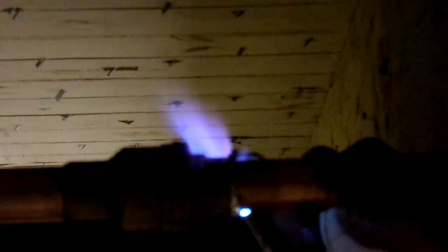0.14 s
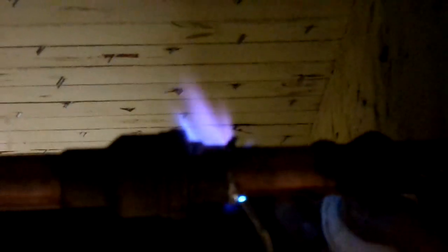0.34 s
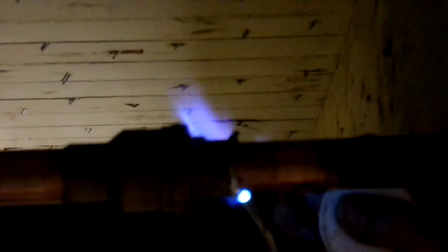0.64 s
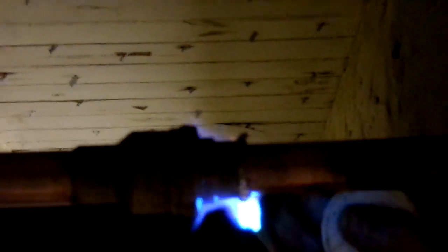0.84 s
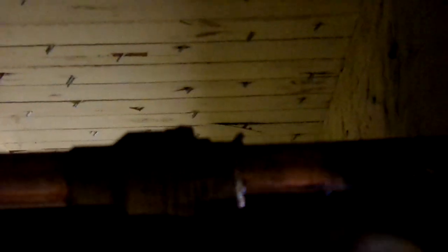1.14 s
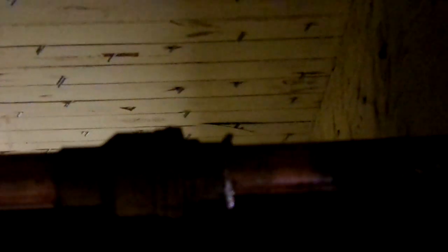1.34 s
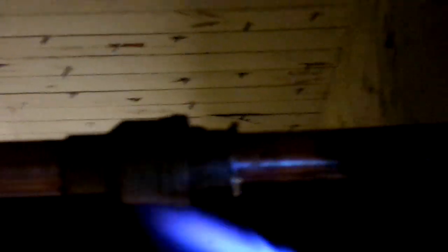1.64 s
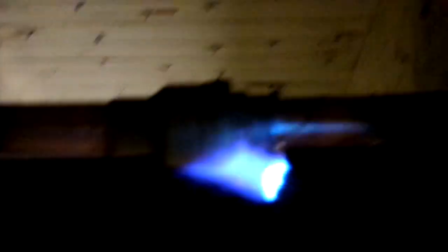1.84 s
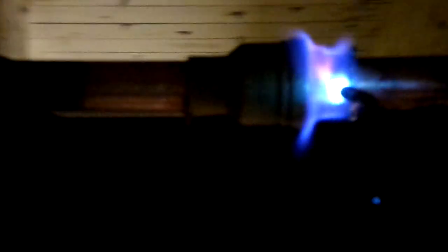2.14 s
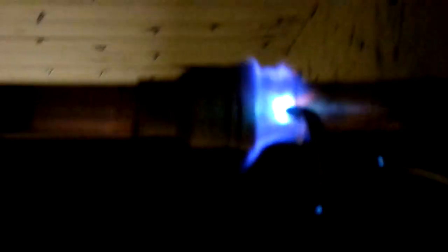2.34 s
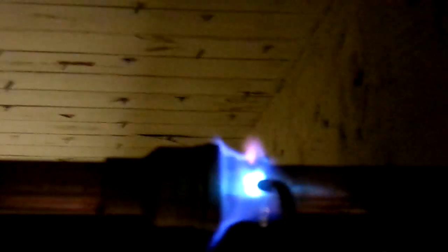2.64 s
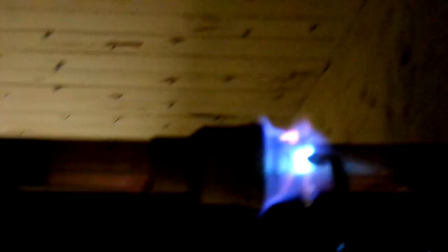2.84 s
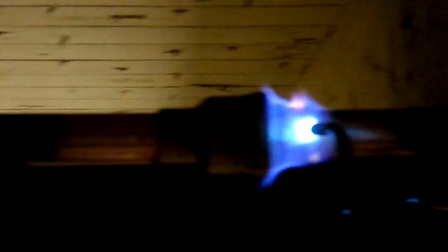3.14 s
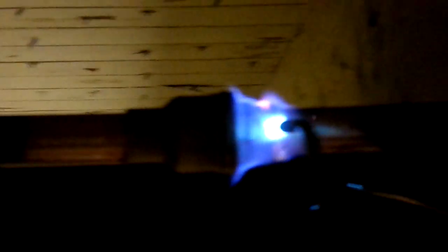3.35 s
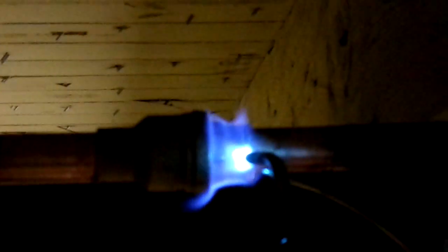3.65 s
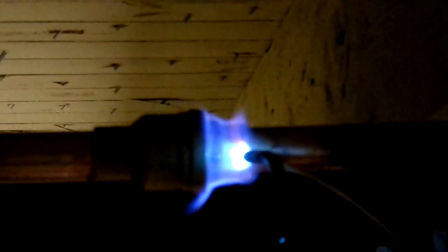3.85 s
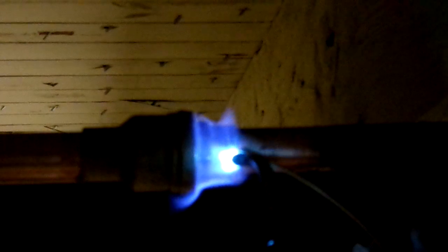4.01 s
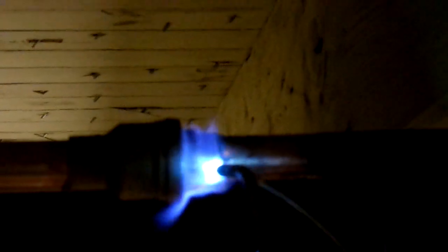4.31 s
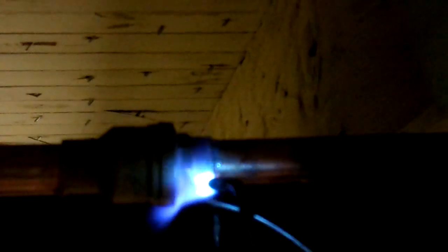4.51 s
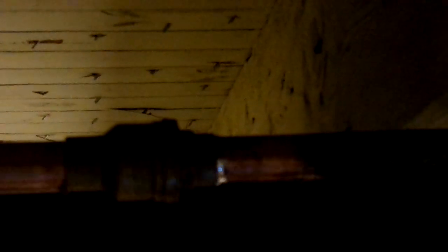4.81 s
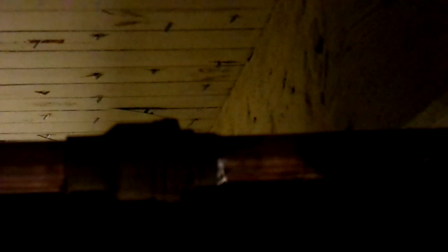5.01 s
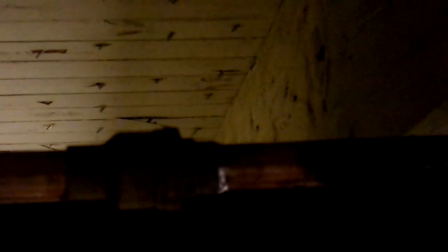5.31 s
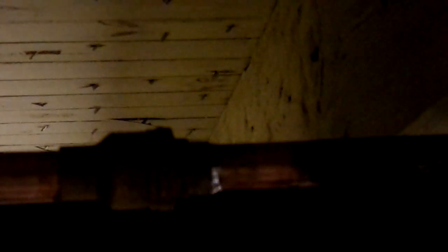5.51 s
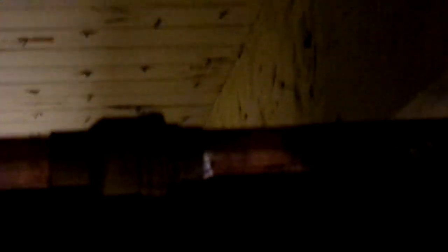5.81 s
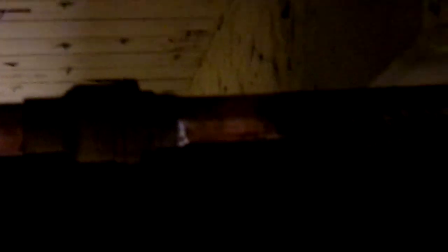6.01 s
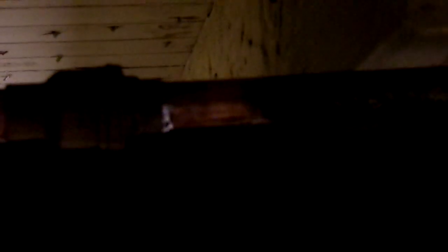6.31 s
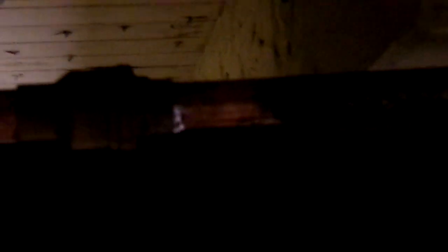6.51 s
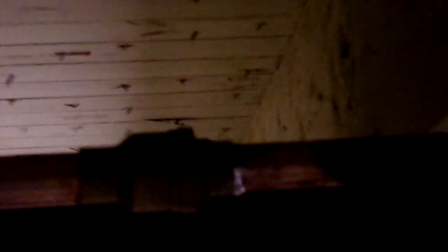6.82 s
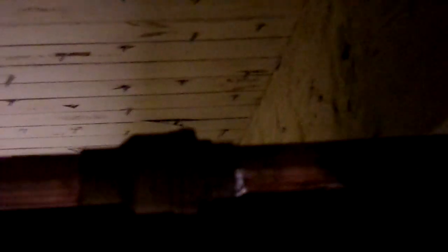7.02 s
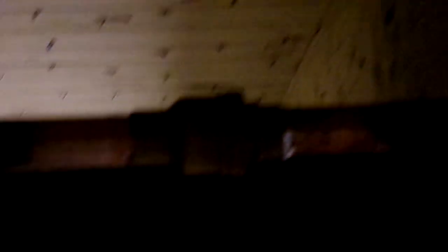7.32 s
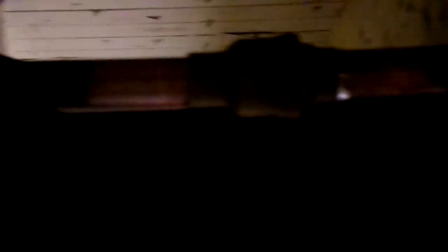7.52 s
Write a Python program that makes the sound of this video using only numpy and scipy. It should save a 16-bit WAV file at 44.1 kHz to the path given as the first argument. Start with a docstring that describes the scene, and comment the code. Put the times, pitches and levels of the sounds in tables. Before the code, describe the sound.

A handheld gas torch burns without a break on a copper pipe joint, very close to a mono microphone in a narrow wooden space. Bright pressurised hiss and a breathy whistle near 3.3 kHz dominate, over a softer combustion roar and faint rumble. About one second in, the whistle drops and falters, then rises again; later moves slide the hollow, phasing colour of the hiss.

```python
"""A handheld gas torch plays on a copper pipe joint in a narrow wooden space, close to a mono microphone.
Its burner tube sings as a noise-driven resonance; jet and flame are coloured noises whose levels follow
the flow: a hiss, a shrill band and a thin top for the gas, a roar and a rumble for the combustion.
Nearby boards and the pipe return echoes, made as a comb filter that slides when the hand moves."""
import sys
import numpy as np
from scipy import signal
from scipy.fft import rfft, irfft, next_fast_len
from scipy.io import wavfile
from scipy.ndimage import map_coordinates

SR = 44100
rng = np.random.default_rng(int(sys.argv[2]) if len(sys.argv) > 2 else 0)


def materialize(psi):
    """Save the field psi as 16-bit PCM at rate SR to the path in sys.argv[1].

    A 1-D psi becomes a single channel; in a 2-D psi each row is a channel.
    """
    bounded = np.clip(np.atleast_2d(psi).T, -1, 1)
    quanta = np.round(bounded * 32767).astype(np.int16)
    wavfile.write(sys.argv[1], SR, quanta)


N = 337796


def amp(db):
    """Gain of a level in dB."""
    return 10 ** (np.asarray(db) / 20)


def unit(x):
    """x scaled to rms 1."""
    return x / np.sqrt(np.mean(x ** 2) + 1e-20)


def curves(rows, t_s=None):
    """Each column after the time, interpolated at t_s (every sample by default)."""
    row_s, *columns = np.transpose(rows)
    if t_s is None:
        t_s = np.arange(N) / SR
    return [np.interp(t_s, row_s, column) for column in columns]


def wobble(knots_per_s):
    """Smooth random curve through normally distributed knots."""
    knots = rng.standard_normal(int(N * knots_per_s / SR) + 4)
    return map_coordinates(knots, [np.arange(N) * knots_per_s / SR])


def filtered(x, response):
    """x times a fixed response of frequency."""
    size = next_fast_len(N + 8192)
    spectrum = rfft(x, size) * response(np.fft.rfftfreq(size, 1 / SR))
    return irfft(spectrum, size)[..., :N]


def swept(x, response, size):
    """x times a response of frequency and time, by short-time spectra."""
    overlap = size * 3 // 4
    hz, t_s, frames = signal.stft(x, SR, nperseg=size, noverlap=overlap)
    frames = frames * response(hz[:, None], t_s)
    return signal.istft(frames, SR, nperseg=size, noverlap=overlap)[1][:N]


def noise(spectrum):
    """Noise of rms 1, coloured by (Hz, relative dB) points on a log frequency axis."""
    point_hz, point_db = np.transpose(spectrum)
    colour = lambda hz: amp(np.interp(np.log(hz + 1), np.log(point_hz), point_db))
    return unit(filtered(rng.standard_normal(N), colour))


def tube():
    """Turbulence excites the burner tube's air column; pitch sags when the flame is disturbed."""
    # Each row: time in seconds, mean note level in dB before the echoes, pitch in Hz.
    note_rows = [(0, -27.5, 3270), (.7, -28.2, 3194), (.8, -29.5, 2900), (.88, -39.5, 2600),
                 (.97, -35.5, 2440), (1.03, -33, 2700), (1.09, -30, 2300), (1.14, -29.5, 2850),
                 (1.25, -23.5, 3300), (1.4, -28.5, 3280), (1.52, -22.5, 3380), (1.57, -29.5, 3400),
                 (1.64, -28, 3410), (1.72, -37, 3290), (2.0, -30, 3410), (2.15, -26, 3330),
                 (4.55, -27.5, 3330), (4.76, -30.5, 3100), (4.87, -35.5, 3300), (5.04, -33, 3330),
                 (5.13, -35, 3330), (5.33, -29, 3380), (5.47, -23, 3440), (5.78, -28.5, 3440),
                 (6.15, -25.5, 3440), (6.68, -25.5, 3340), (6.85, -27, 3370), (7.0, -31.5, 3396),
                 (7.11, -27.5, 3365), (7.2, -32, 3320), (7.32, -24.5, 3400), (7.66, -28, 3430)]
    # Half width of the undisturbed note in Hz, one per place of the torch:
    # broad while the flame splashes on the pipe, thin in free air.
    place_half_hz = [90, 115, 115, 140, 140, 62, 62]
    rest_hz, widening_hz_per_hz = 3160, 0.22  # sag below rest_hz widens the note
    swing_hz = 500  # widening by the draught of a move, per unit of path change
    level_db, _ = curves(note_rows)

    def resonance(hz, t_s):
        pitch_hz = curves(note_rows, t_s)[1]
        place, path_divisor = hand(t_s)
        half_hz = np.interp(place, np.arange(len(place_half_hz)), place_half_hz)
        half_hz += swing_hz * abs(1 - path_divisor)
        half_hz += widening_hz_per_hz * np.maximum(rest_hz - pitch_hz, 0)
        return half_hz ** -.5 / (1 + ((hz - pitch_hz) / half_hz) ** 2)

    note = unit(swept(rng.standard_normal(N), resonance, size=1024))
    # the column partly sustains itself, which evens out its beating
    envelope = np.abs(signal.hilbert(note, next_fast_len(N))[:N])
    note = unit(note / (envelope + .3) ** .22)
    return amp(level_db + 0.37 * wobble(9.9)) * note


def jet():
    """Turbulent gas: broad hiss and shrill band share a flutter of the flow, under a thin top hiss."""
    # Each row: time in seconds, mean hiss level in dB, mean shrill level in dB, both before the echoes.
    # The treble beams along the nozzle.
    flow_rows = [(0, -34.5, -30), (.75, -33, -29.5), (.92, -36.5, -33), (1.02, -33, -26.5),
                 (1.1, -32, -28.5), (1.25, -30, -26), (1.46, -32, -23.5), (1.525, -32.5, -21.5),
                 (1.56, -32.5, -28), (1.8, -33.5, -28.5), (2.03, -31.5, -31.5), (2.25, -28.5, -27.5),
                 (3.2, -28, -27), (3.65, -31.5, -29.5), (4.45, -30.5, -30), (4.8, -33.5, -29),
                 (5.02, -37.5, -29.5), (5.22, -32, -29.5), (5.55, -34.5, -27), (6.35, -33.5, -26.5),
                 (6.95, -32.5, -29), (7.12, -34, -26), (7.32, -33.5, -29), (7.66, -36, -28.5)]
    # Each row: time in seconds, mean top hiss level in dB before the echoes.
    top_rows = [(0, -52), (.6, -60), (1.45, -38), (1.75, -46), (2.6, -58), (3.6, -45), (5.1, -41.5),
                (6.5, -46), (7.0, -38), (7.66, -42)]
    # Noise colours. Each row: frequency in Hz, relative density in dB.
    hiss_colour = [(1500, -69), (2600, -8), (4300, 1), (5300, 4), (6300, 1.5), (7500, -19), (10000, -11),
                   (13000, -62)]
    shrill_colour = [(5000, -34.5), (6400, -3.5), (7300, -0.5), (8200, 4.5), (9000, -4), (9900, -13.5),
                     (11000, -22.5), (12500, -28)]
    top_colour = [(7000, -27), (10000, 5), (12400, -8), (14700, -9), (16000, 5.5)]

    hiss_db, shrill_db = curves(flow_rows)
    top_db, = curves(top_rows)
    flutter = wobble(22)
    hiss = amp(hiss_db + 0.34 * flutter + 0.6 * wobble(12)) * noise(hiss_colour)
    shrill = amp(shrill_db + 0.71 * flutter + 0.2 * wobble(17)) * noise(shrill_colour)
    top = amp(top_db + .9 * wobble(25)) * noise(top_colour)
    return hiss + shrill + top


def flame():
    """Combustion roar, and a rumble coloured by the low modes of the space."""
    # Each row: time in seconds, roar level in dB, rumble level in dB, both before the echoes.
    level_rows = [(0, -37.5, -51), (1.2, -36.8, -48.5), (1.65, -39.5, -54.5), (2.1, -40.5, -49.5),
                  (4.7, -40.5, -51), (5.2, -38.5, -56), (6.2, -39.5, -53.5), (7.66, -39.5, -57.5)]
    # Noise colours. Each row: frequency in Hz, relative density in dB.
    roar_colour = [(150, -62), (300, -12), (500, -4), (900, -1.5), (1500, -3), (2300, -1), (3500, 2.5),
                   (6000, -32)]
    rumble_colour = [(20, -45), (70, -56), (125, -28), (180, -9.5), (260, -7), (380, -3), (500, -5.5),
                     (900, -23)]
    # Low modes. Each row: centre in Hz, full width in Hz, boost in dB.
    modes = [(170, 21, 3.5), (216, 9.3, 3), (395, 45, -1.5)]

    def mode_gain(hz):
        return amp(sum(db / (1 + (2 * (hz - centre_hz) / width_hz) ** 2) for centre_hz, width_hz, db in modes))

    roar_db, rumble_db = curves(level_rows)
    roar = amp(roar_db) * noise(roar_colour)
    rumble = amp(rumble_db) * unit(filtered(noise(rumble_colour), mode_gain))
    return roar + rumble


def hand(t_s):
    """Place number and path divisor: each move rescales the echo paths, then the next place takes over."""
    # Each row: set-off in seconds, start of the change of echoes in seconds, settling in seconds,
    # divisor of the echo paths reached when the change starts.
    moves = [(.72, 1.0, 1.13, .88), (1.3, 1.54, 1.64, 1.02), (1.65, 1.96, 2.08, 1.1), (2.2, 3.1, 3.55, .98),
             (4.55, 4.98, 5.15, .78), (5.85, 6.2, 6.65, .98)]
    place, path_divisor = 0, 1
    for off_s, yield_s, settle_s, divisor in moves:
        place = place + np.interp(t_s, [yield_s, settle_s], [0, 1])
        path_divisor = path_divisor * np.interp(t_s, [off_s, yield_s, settle_s], [1, divisor, 1])
    return place, path_divisor


def walls(x, far_count=40):
    """Direct sound and echoes interfere: a comb, applied as magnitude, slides as the torch moves."""
    # One list per place: under the joint, lowered, coming round, on the joint, a little along it,
    # drawn back, held aside. Each row: delay at rest in ms, reflection factor.
    place_echoes = [
        [(.384, .15), (2.827, -.16), (2.906, -0.041), (3.263, 0.23), (3.329, 0.088), (3.758, -.22),
         (3.943, -0.29)],
        [(.37, 0.16), (1.382, 0.16), (2.323, .1), (3.194, 0.14), (4.174, -0.2), (4.355, -.17), (5.679, -0.19)],
        [(.303, 0.12), (.926, -0.18), (3.206, 0.11), (3.334, 0.12), (3.977, -0.17), (5.672, -.13),
         (7.416, 0.16)],
        [(.633, -0.15), (1.387, 0.14), (1.947, 0.1), (2.19, 0.059), (3.256, .27), (3.813, -0.28),
         (6.006, -0.26)],
        [(.643, -0.15), (1.408, 0.14), (2.26, 0.083), (2.875, 0.14), (3.858, -0.17), (5.02, 0.23),
         (5.927, -0.18)],
        [(.86, .15), (1.18, -0.085), (1.32, 0.22), (2.87, -0.089), (3.98, -0.3), (4.45, -.15), (5.33, 0.24)],
        [(1.568, -0.13), (2.068, -0.15), (2.935, -0.21), (4.019, -0.2), (4.4, -.13), (5.2, 0.16), (6.6, -0.18)],
    ]
    # Strongest echo, off the nearest board, follows the hand.
    # Each row: time in seconds, delay in ms, reflection factor from 3500 Hz up.
    board_rows = [(0, .49, 0.092), (.7, 0.54, 0.11), (.86, 0.5, 0.24), (1.18, 0.58, .16), (1.56, .52, 0.29),
                  (1.68, 0.59, 0.3), (1.94, 0.64, 0.13), (2.12, 0.57, 0.29), (2.4, 0.57, 0.35),
                  (4.2, 0.53, 0.25), (4.65, 0.62, 0.21), (4.8, .82, 0.43), (4.92, 0.87, .28),
                  (5.18, 1.17, 0.36), (5.5, 1.02, 0.29), (5.9, 1.03, 0.23), (6.33, 1.07, 0.24),
                  (6.84, 1.03, 0.32), (7.06, 1.14, 0.41), (7.66, 0.86, 0.18)]
    far_db = -4.5  # far walls, from 700 Hz up
    shake = .012  # share by which the held torch stretches the paths
    grid_hz = np.arange(0, SR * .7, 5.)

    def turn(hz, delay_ms):
        return np.exp(-2j * np.pi * hz * delay_ms / 1000)

    near = []
    for echoes in place_echoes:
        delay_ms, reflection = np.transpose(echoes)
        near.append(1 + turn(grid_hz[:, None], delay_ms) @ reflection)
    far = []  # two random sets per place
    for _ in range(2 * len(place_echoes)):
        delay_ms = rng.uniform(size=far_count) * 14 + 2
        size = rng.standard_normal(far_count) * amp(-1.4 * delay_ms)  # longer paths arrive weaker
        far.append(turn(grid_hz[:, None], delay_ms) @ size / np.linalg.norm(size))

    def comb(hz, t_s):
        sample_s = np.arange(N) / SR
        place, path_divisor = hand(t_s)
        path_divisor = path_divisor + shake * np.interp(t_s, sample_s, wobble(2.526))
        # long waves stand in the space and care less where the torch is
        short_wave = np.clip(hz / 3500, .4, 1)
        at = [place + 0 * hz, hz / path_divisor ** short_wave / grid_hz[1]]

        def read(responses):
            real = map_coordinates(np.real(responses), at, order=1)
            return real + 1j * map_coordinates(np.imag(responses), at, order=1)

        # small hand tremors rearrange the long paths: the two far sets slowly trade places
        tremor = np.interp(t_s, sample_s, 0.81 * wobble(3.02))
        distant = np.cos(tremor) * read(far[::2]) + np.sin(tremor) * read(far[1::2])
        distant = np.clip(hz / 700, .5, 1) * amp(far_db) * distant
        board_ms, board_reflection = curves(board_rows, t_s)
        nearest = short_wave * board_reflection * turn(hz, board_ms)
        return np.abs((1 + nearest) * (read(near) + distant))

    return swept(x, comb, size=2048)


def scene():
    """Torch among its echoes; one microphone feeds both channels."""
    sound = walls(tube() + jet() + flame())
    return np.array([sound, sound])


def record(dry):
    """Microphone response: deep bass rolls off and nothing passes above the band limit."""
    bass_hz, top_hz = 104.0, 15720  # half amplitude, band limit
    return filtered(dry, lambda hz: hz ** 4 / (hz ** 4 + bass_hz ** 4) * (hz < top_hz))


dry = scene()
out = record(dry)
materialize(out)
```